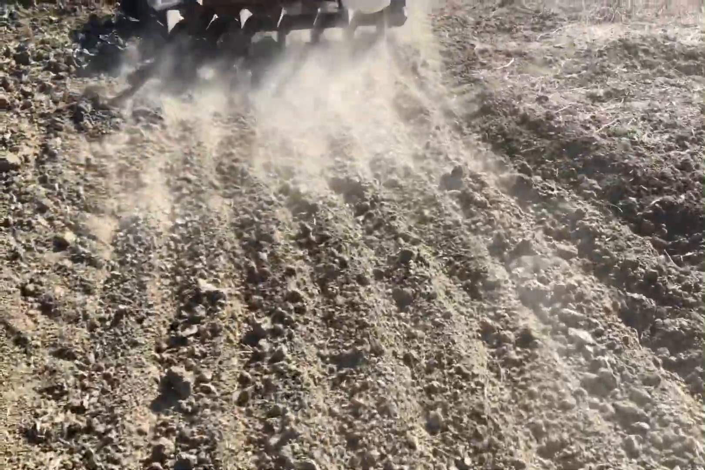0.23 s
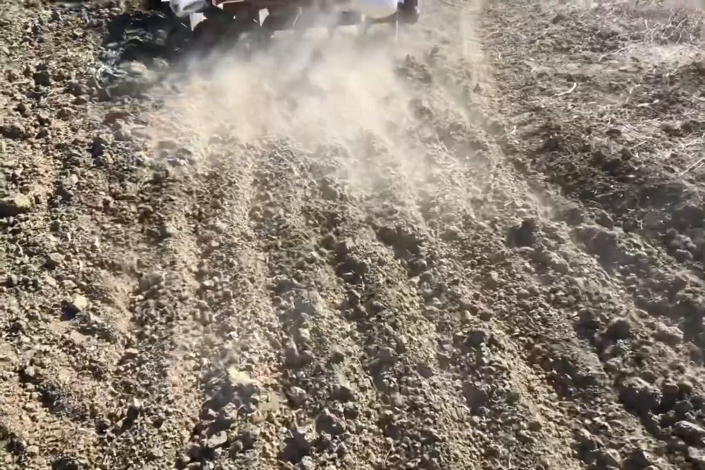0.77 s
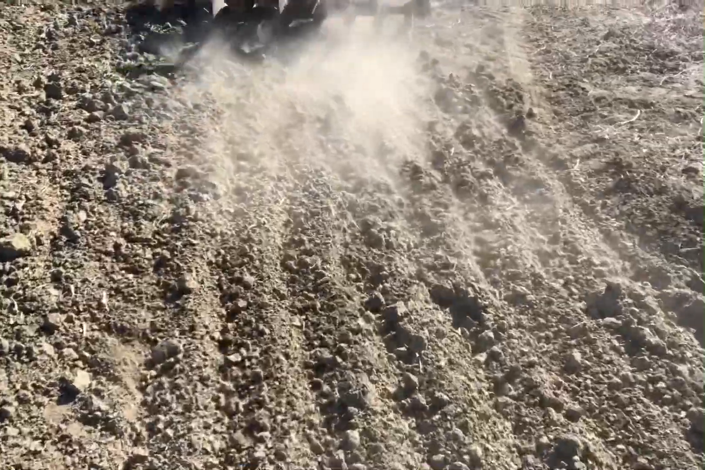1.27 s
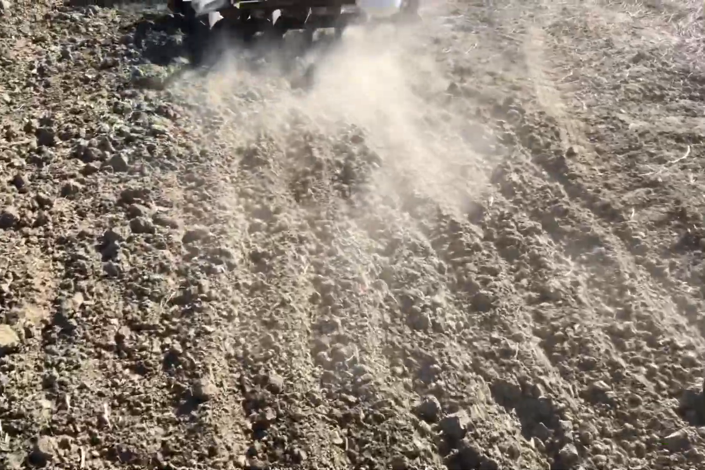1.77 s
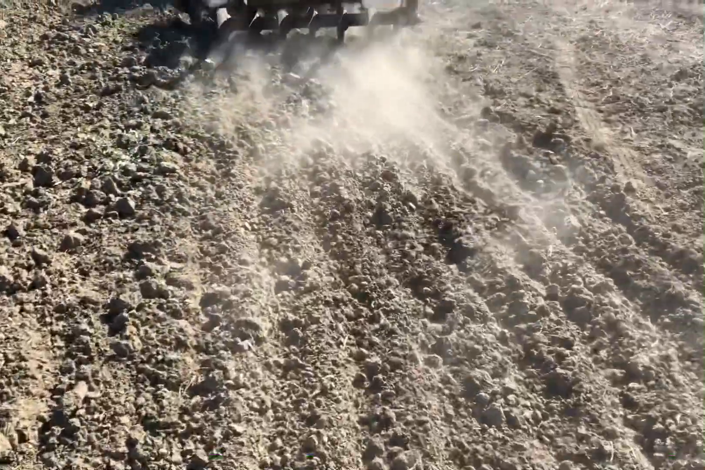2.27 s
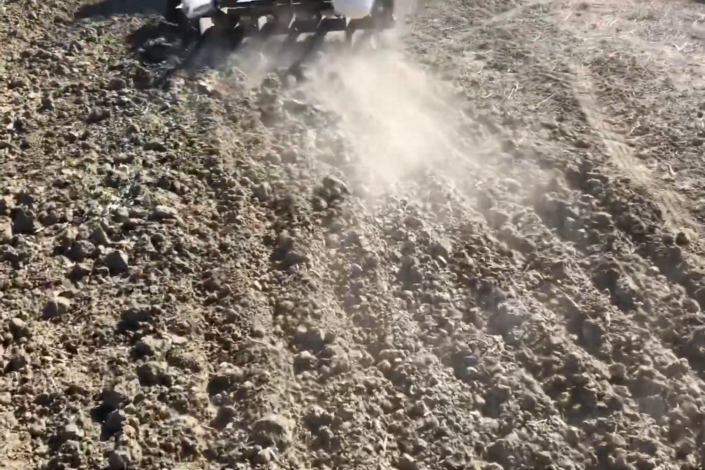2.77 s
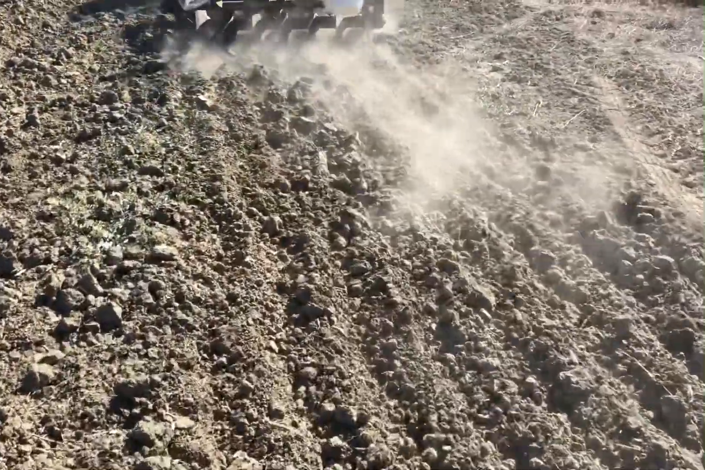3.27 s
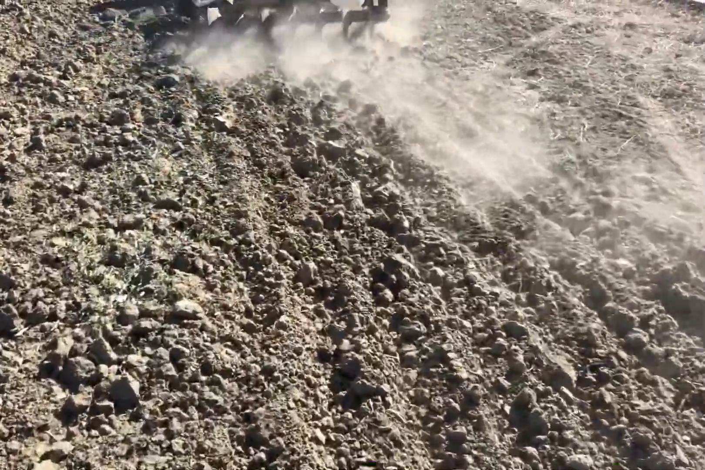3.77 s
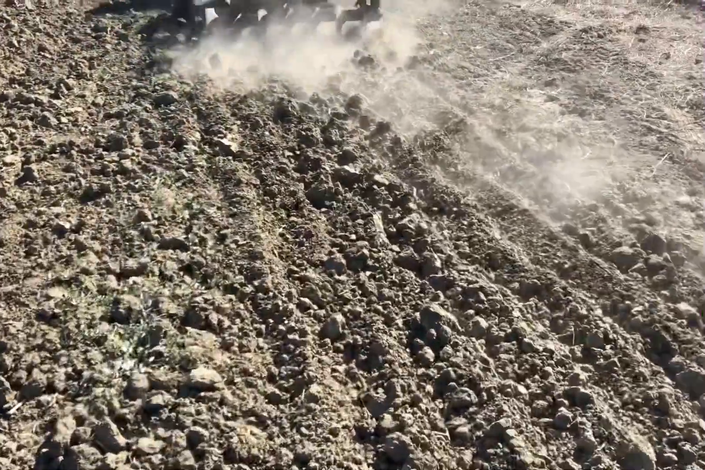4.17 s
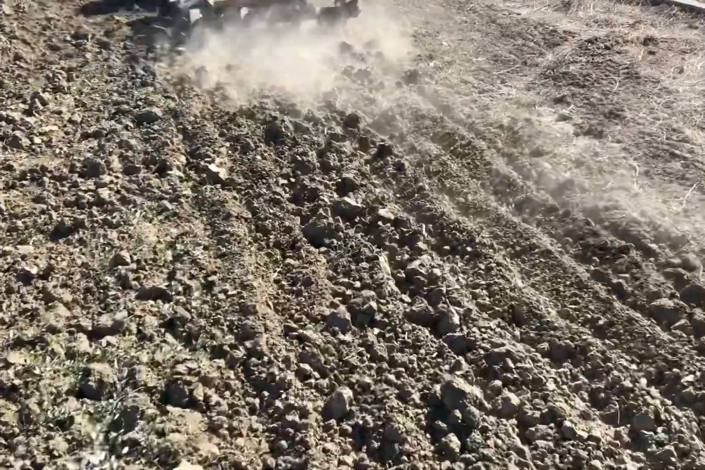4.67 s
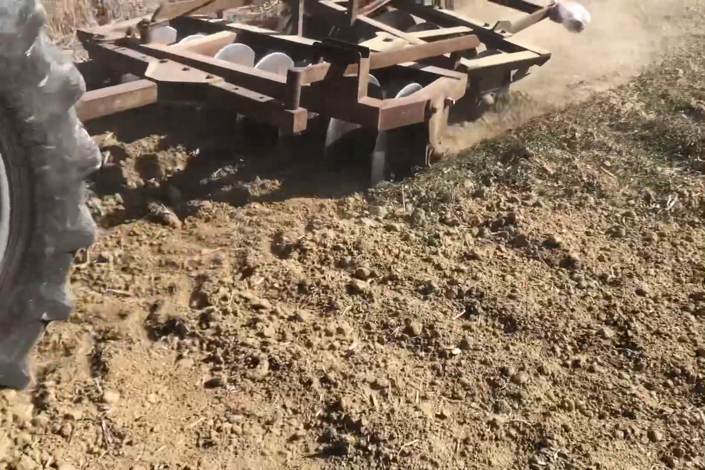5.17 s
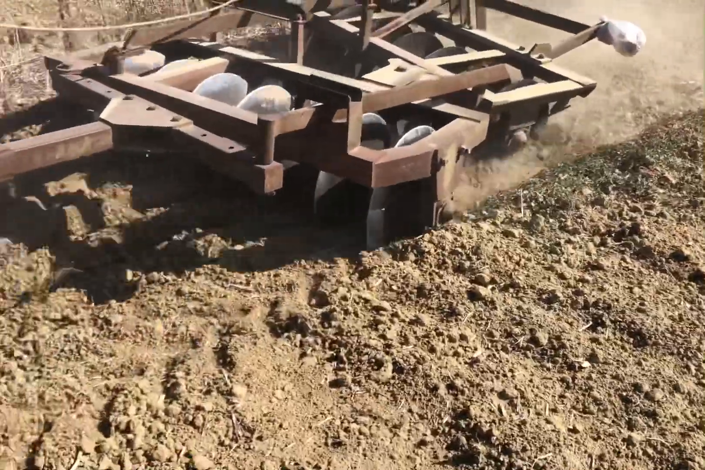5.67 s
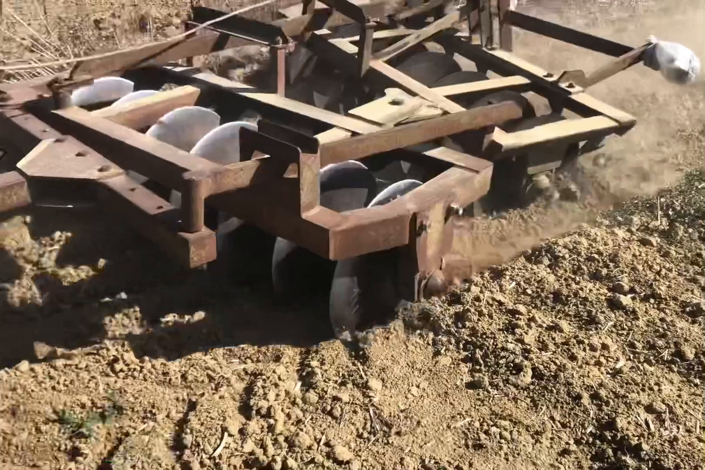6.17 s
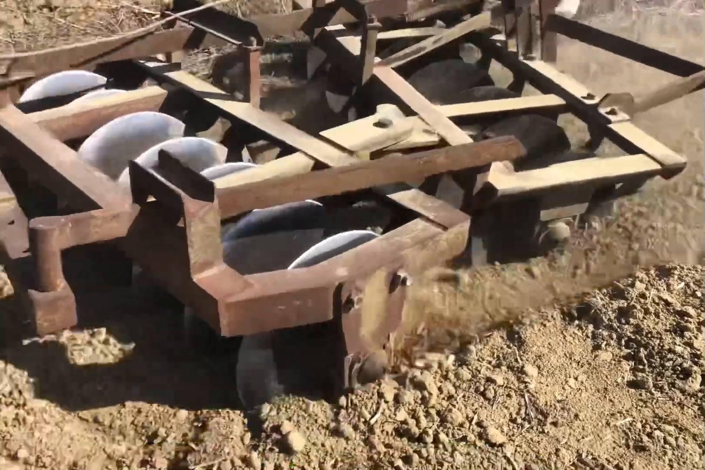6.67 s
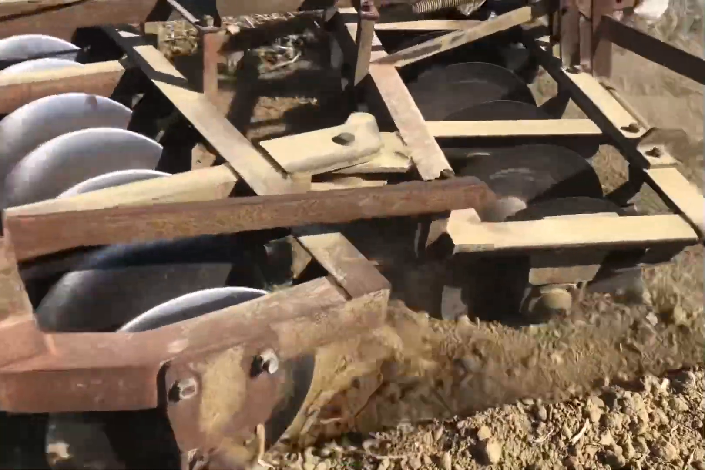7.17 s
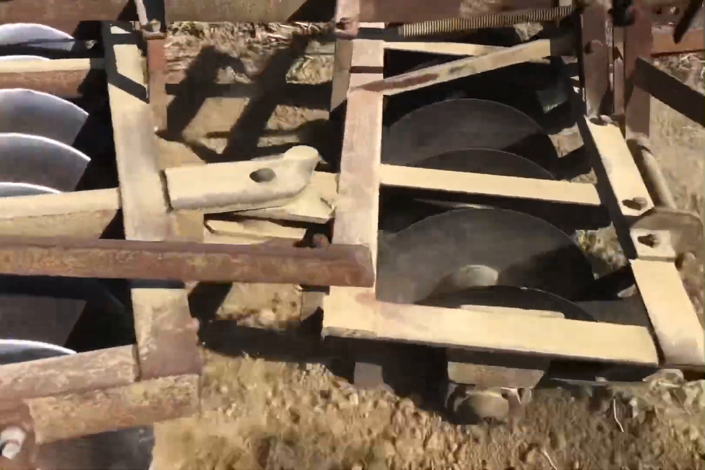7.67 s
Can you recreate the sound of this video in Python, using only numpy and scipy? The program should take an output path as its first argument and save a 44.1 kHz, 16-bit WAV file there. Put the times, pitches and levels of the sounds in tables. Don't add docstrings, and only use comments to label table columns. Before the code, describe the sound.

From 0 to about 4.8 s a tractor works at a distance in an open field: a low, almost constant diesel drone of rapid firings, mixed with dull, grainy soil and machine noise that slowly recedes. Light wind rumbles on the microphone; gusts duck the bass, notably in the first half second, near 1.3 s and around 3.5-4 s. Small stone clacks come irregularly, with very faint high squeaks. From 4 s the hiss brightens. At 4.8 s it cuts abruptly to a much louder close pass, slightly higher in pitch: engine clatter, whine and valve ticks, strongest near 5.1-5.5 s. A low air thud hits at 5.7 s; soil hiss swells at 5.9 s with a thin squeak at 6 s. The engine then fades, pins rattle, stones clank at 6.7 and 6.9 s, squeaks scatter around 7-7.4 s, and crunching soil and a loud burst of clanks finish at 7.7-7.9 s.

```python
import sys
import numpy as np
from scipy import signal
from scipy.io import wavfile

SR = 44100
rng = np.random.default_rng(int(sys.argv[2]) if len(sys.argv) > 2 else 0)


def unload_audio(sound):
    columns = np.transpose(np.atleast_2d(sound))
    steps = np.round(np.clip(columns, -1, 1) * 32767)
    wavfile.write(sys.argv[1], SR, steps.astype(np.int16))


def natural_amplitude(level_db):
    exponent = np.asarray(level_db, float) / 20
    return 10 ** exponent


N = 349272
CHANGE_S = 4.766


# t/s, firings per second
FIRING_RATE = [
    (0, 62.55),
    (2, 62.7),
    (3.4, 62.7),
    (4.0, 63.0),
    (4.76, 63.1),
    (4.77, 64.95),
    (6, 64.85),
    (7.92, 64.7),
]


def engine_cycle():
    return np.cumsum(2 * np.pi * curve(FIRING_RATE, np.arange(N) / SR) / 4 / SR)


def exhaust(cycle, order_db, unsteady_db):
    lag = rng.uniform(0, 2 * np.pi, len(order_db))
    out = 0
    for k, db in enumerate(order_db, 1):
        phase = k * cycle - np.pi / 10 + (k % 4 > 0) * lag[k - 1]
        level_db = db + (k > 4) * unsteady_db * drift(3.24, len(cycle))
        out = out + np.sqrt(2) * natural_amplitude(level_db) * np.cos(phase)
    return out


# multiple of the engine cycle, level/dB
FAR_ORDERS = [(1, -46), (2, -35), (3, -24), (4, 4), (5, -23.5), (6, -56), (7, -5.5), (8, 1), (9, -26),
              (10, -19), (11, -7.5), (12, -12.5), (13, -23.5), (14, -16), (15, -20), (16, -30), (17, -22),
              (18, -42), (19, -35.5), (20, -23.5), (21, -35), (22, -59)]
FAR_EXHAUST_DB = -33.5


def far_exhaust(cycle, t):
    order_db = np.array(FAR_ORDERS)[:, 1]
    return natural_amplitude(FAR_EXHAUST_DB + ducking_db(t)) * exhaust(cycle, order_db, unsteady_db=1.4)


# multiple of the engine cycle, level/dB
SIDE_ORDERS = [(1, -49), (2, -43), (3, -25), (4, 5.5), (5, -16), (6, -63), (7, -7), (8, -24.5), (9, -15),
               (10, -14), (11, -31.5), (12, -14.5), (13, -14), (14, -33), (15, -15), (16, -24), (17, -8.5),
               (18, -33), (19, -38), (20, -48), (21, -37.5), (22, -14)]
REAR_ORDERS = [(1, -46), (2, -39), (3, -23), (4, -0.5), (5, -18), (6, -23), (7, -10), (8, -0.5), (9, -24),
               (10, -22), (11, -5.5), (12, -18.5), (13, -14.5), (14, -20.5), (15, -53), (16, -16.5),
               (17, -22.5), (18, -17.5), (19, -19.5), (20, -27), (21, -65), (22, -28)]
NEAR_EXHAUST_DB, EXHAUST_FALL = -19, 0.7
STACK_ABEAM_S, STACK_CLOSEST_M = 5.45, 1.8
REAR_NOTE_CURVE = 1.4


def near_exhaust(cycle, t):
    along, distance = passing(t, STACK_ABEAM_S, STACK_CLOSEST_M)
    behind = (np.abs(along) / distance) ** REAR_NOTE_CURVE
    order_db = [side + behind * (rear - side) for (_, side), (_, rear) in zip(SIDE_ORDERS, REAR_ORDERS)]
    loss_db, _, _ = engine_view(t)
    return natural_amplitude(NEAR_EXHAUST_DB - EXHAUST_FALL * loss_db) * exhaust(cycle, order_db, unsteady_db=1.7)


# f/Hz, width/Hz, lift level/dB
CASING = [(630.4, 28.6, 10.5), (1254, 32, 6), (2760, 39, 5), (4040, 375, 11.5), (5250, 140, 4),
          (5200, 1170, 5), (6700, 130, 4), (10000, 1100, 0.5)]
# f/Hz, level per Hz/dB
CLATTER_COLOUR = [(130, -35), (220, 0), (278, -6), (326, 1.5), (547, 0), (609, 0), (755, -1), (1880, -1),
                  (2210, -6), (2780, -8.5), (3210, -23.5), (4590, -19.5), (5580, -18), (15700, -18)]
NEAR_CLATTER_DB, CLATTER_SHADOW_DB = -17, 7.5


def near_clatter(cycle, t):
    beat_db = knock(cycle, depth_db=1.5)
    clatter = grind(CLATTER_COLOUR, grains_per_s=1400, grain_db=-3.5, patchy_db=0.62, beat_db=beat_db)
    clatter += sum((natural_amplitude(db) - 1) * resonance(clatter, hz, width_hz) for hz, width_hz, db in CASING)
    whine = gear_whine(cycle)
    valve_gain = natural_amplitude(5.5 - 9.0 * (t - t[0]))
    ticks = valve_gain * valves(cycle)
    chassis = natural_amplitude(-10) * rumble(len(cycle), lumpy_db=-0.5)
    loss_db, end_on, gone_by = engine_view(t)
    level_db = NEAR_CLATTER_DB - loss_db - CLATTER_SHADOW_DB * end_on * gone_by
    return natural_amplitude(level_db) * (0.75 * clatter + whine + ticks + chassis)


def knock(cycle, depth_db):
    return depth_db * (np.cos(4 * cycle - 1.6) + 0.1 * np.cos(cycle - 2.4))


WHINE_ORDERS = [32, 44, 50, 56, 60, 64, 112, 168]
WHINE_DB = [-24, -20, -23, -18, -18, -18, -23, -29]


def gear_whine(cycle):
    out = 0
    for k, db in zip(WHINE_ORDERS, WHINE_DB):
        out = out + natural_amplitude(db + 2.5 * drift(5.0, len(cycle))) * np.sin(k * cycle)
    return out


# f/Hz, level/dB, t60/s
VALVE_MODES = [(2940, -19, .016), (3950, -22, .014), (5220, -17, .02), (5480, -15, .02), (5750, -17, .018),
               (6430, -17, .024), (7060, -21, .016)]


def valves(cycle):
    firing = np.floor(cycle * 2 / np.pi)
    at = np.flatnonzero(np.diff(firing))
    out = 0
    for hz, db, t60 in VALVE_MODES:
        tick_db = db + 4 * (firing[at] % 4 == 0) + rng.normal(0, 4, len(at))
        clicks = np.zeros(len(cycle))
        clicks[at] = natural_amplitude(tick_db) * either_sign(len(at))
        out = out + ring(clicks, hz, t60)
    return out


PUFF_DB, PUFF_RISE_DB_PER_S, PUFF_LOW_HZ = -49, 15.0, 7000


def puffs(cycle):
    firing = np.floor(cycle * 2 / np.pi).astype(int)
    strength_db = rng.normal(0, 3.5, firing[-1] + 1)[firing] + knock(cycle, depth_db=6.0)
    hiss = high_pass(rng.standard_normal(len(cycle)), PUFF_LOW_HZ)
    to_change = CHANGE_S - np.arange(len(cycle)) / SR
    level_db = PUFF_DB - PUFF_RISE_DB_PER_S * to_change
    return natural_amplitude(level_db) * rms_one(natural_amplitude(strength_db) * hiss) * (to_change > 0)


# f/Hz, level per Hz/dB
SOIL_COLOUR = [(130, -22), (220, -1), (314, -8), (404, -8), (450, 3.5), (703, -9), (919, 5.5), (1140, -10),
               (1270, -2.5), (2830, -13), (3210, -16), (10600, -21), (15700, -27)]
NEAR_SOIL_DB, SOIL_END_ON_DB = -32.5, 2.5
DISCS_ABEAM_S, DISCS_WIDTH_S, DISCS_LIFT_DB = 5.93, 0.29, 3
REAR_GANG_S, REAR_GANG_DB_PER_S = 7.5, 10.5


def near_soil(cycle, t):
    beat_db = knock(cycle, depth_db=0.1)
    soil = grind(SOIL_COLOUR, grains_per_s=1000, grain_db=-8.5, patchy_db=2.04, beat_db=beat_db)
    _, end_on, _ = engine_view(t)
    level_db = NEAR_SOIL_DB + SOIL_END_ON_DB * end_on
    level_db += DISCS_LIFT_DB * np.exp(-((t - DISCS_ABEAM_S) / DISCS_WIDTH_S) ** 2)
    level_db += REAR_GANG_DB_PER_S * np.maximum(t - REAR_GANG_S, 0)
    return natural_amplitude(level_db) * soil


# t/s, peak level/dB, centre f/Hz, rattle length/s, ring level/dB
STONES = [(0.312, -37, 1190, .01, -18), (.395, -36, 7000, .006, -28), (0.722, -26, 2200, 0.018, -34),
          (1.114, -26.5, 3800, .008, -32), (1.572, -27.5, 2030, 0.017, -27), (2.075, -25, 2410, .01, -29),
          (2.21, -25.5, 1560, 0.027, -34), (2.426, -24, 1900, .013, -31), (2.818, -22.5, 1520, 0.016, -32),
          (3.342, -25.5, 1190, 0.017, -30), (3.83, -35, 1500, 0.013, -22), (4.017, -27, 2860, 0.017, -34),
          (4.251, -24, 1900, 0.012, -33), (4.505, -27, 2580, 0.0099, -30), (6.693, -23, 5740, 0.0062, -26),
          (6.928, -21, 1270, 0.058, -26), (7.714, -14, 3900, 0.026, -33), (7.737, -13, 2940, 0.006, -26),
          (7.7416, -10, 4680, 0.014, -26), (7.763, -8, 397, .018, -25.5), (7.792, -10.5, 1410, 0.017, -40),
          (7.824, -22, 9000, 0.0079, -24), (7.852, -11, 2055, 0.014, -30), (7.86, -15, 400, 0.021, -27)]
# f/Hz, level/dB, t60/s
DISC_MODES = [(597, 1.5, 0.06), (1347, 4.5, 0.043), (1840, -12, 0.11), (1970, 2.5, 0.038), (3160, -6, 0.12),
              (4380, -4, 0.085), (6450, -11, 0.076), (6985, -8, 0.08)]
FAR_CRACK_TOP, NEAR_CRACK_TOP = 1.8, 3.4


def stones():
    size = 6000
    out = np.zeros(N + size)
    for s, db, hz, length, ring_db in STONES:
        fading = np.exp(-(np.arange(size) / (length * SR)) ** 2)
        uneven = rng.standard_normal(size) * natural_amplitude(2.75 * rng.standard_normal(size) - 8)
        clicks = natural_amplitude(db) * fading * uneven
        top_hz = hz * (FAR_CRACK_TOP if s < CHANGE_S else NEAR_CRACK_TOP)
        crack = band(clicks, hz / 5, min(top_hz, .45 * SR))
        hit = band(crack, hz / 8, min(1.4 * top_hz, .45 * SR))
        for spot_hz in np.clip(hz * 2 ** rng.uniform(-1.5, 1, 14), 300, 15000):
            hit += natural_amplitude(rng.normal(-35, 2.5)) * ring(clicks * either_sign(size), spot_hz, .022)
        in_tune = np.abs(clicks) * np.cos(3 * np.pi * hz * np.arange(size) / SR) / np.sqrt(length * SR)
        hit += natural_amplitude(ring_db + 4) * ring(in_tune, 1.5 * hz, .045)
        for mode_hz, mode_db, t60 in DISC_MODES:
            level_db = mode_db + ring_db + 0.5 - 2.8 * np.log2(mode_hz / hz) ** 2
            hit += natural_amplitude(level_db) * ring(clicks * either_sign(size), mode_hz, t60)
        start = int(s * SR)
        out[start:start + size] += hit
    return out[:N]


RATTLES_PER_S, RATTLE_T60_S, RATTLE_SPREAD_DB = 80, .07, 3.0
FAR_RATTLE_DB, NEAR_RATTLE_DB, RATTLE_FADE_DB_PER_S = -52, -26.5, 5


def rattles():
    t = np.arange(N) / SR
    sizes = natural_amplitude(RATTLE_SPREAD_DB * np.minimum(rng.exponential(1, N), 4))
    knocks = sizes * (rng.random(N) < RATTLES_PER_S / SR)
    pitches = 500 * 2 ** rng.uniform(0, 2.4, 24)
    part = rng.integers(0, 24, N)
    out = 0
    for k, hz in enumerate(pitches):
        out = out + natural_amplitude(-4.0 * np.log2(hz / 500)) * ring(knocks * (part == k), hz, RATTLE_T60_S)
    near_db = NEAR_RATTLE_DB - RATTLE_FADE_DB_PER_S * (t - CHANGE_S)
    return natural_amplitude(np.where(t < CHANGE_S, FAR_RATTLE_DB, near_db)) * rms_one(out)


# t/s, length/s, level/dB
SQUEAKS = [(0.838, .03, -55), (1.24, .05, -58), (2.22, .04, -59), (2.39, .02, -58), (2.48, .05, -59),
           (2.72, .08, -60), (2.785, 0.051, -50), (5.97, .05, -41), (6.008, .045, -35), (6.914, .065, -45),
           (7.038, .07, -48), (7.148, .04, -51), (7.21, .03, -43), (7.34, .03, -45), (7.43, .03, -47),
           (7.802, 0.092, -45)]
SQUEAK_HZ = 10345


def squeaks():
    loudness = np.sqrt(2) * natural_amplitude(3.0 * drift(40, N))
    hz = SQUEAK_HZ + 25 * drift(31, N)
    note = loudness * np.sin(np.cumsum(2 * np.pi * hz / SR))
    out = np.zeros(N)
    for s, length, db in SQUEAKS:
        span, swell = bump(s, length)
        out[span] += natural_amplitude(db + 1.0) * np.sqrt(swell) * note[span]
    return out


# f/Hz, level per Hz/dB
FAR_COLOUR = [(150, -7), (260, -9.5), (336, -23.5), (413, -2), (458, -3), (603, -3.5), (668, -3),
              (1200, -3), (1400, -3.5), (3720, -18), (5920, -26), (8780, -25), (15700, -33)]
FAR_NOISE_DB, FAR_TREBLE_DB, RECEDE_DB_PER_S = -36, -32.5, 0.33
SWELL_S, SWELL_TREBLE_DB, SWELL_CURVE = 3.93, 8, 1.9


def far_machine(cycle, t):
    beat_db = knock(cycle, depth_db=1.35)
    noise = grind(FAR_COLOUR, grains_per_s=830, grain_db=-24, patchy_db=0.94, beat_db=beat_db)
    noise = noise + resonance(noise, 603, 45) + natural_amplitude(-6) * resonance(noise, 870, 32)
    bright = high_pass(noise, 2400)
    away_db = -RECEDE_DB_PER_S * t
    swelled = np.maximum(t - SWELL_S, 0) / (CHANGE_S - SWELL_S)
    treble_db = FAR_TREBLE_DB + away_db + SWELL_TREBLE_DB * swelled ** SWELL_CURVE
    return natural_amplitude(FAR_NOISE_DB + away_db) * (noise - bright) + natural_amplitude(treble_db) * bright


# t/s, level/dB
WIND = [
    (0, -36.5),
    (.6, -37.5),
    (1.1, -38),
    (1.7, -37),
    (2.3, -38),
    (3.3, -45.5),
    (3.65, -34),
    (4.1, -45),
    (4.76, -33.5),
]
WIND_DUCK_SHARE = 0.68


def wind(t):
    level_db = curve(WIND, t) + WIND_DUCK_SHARE * ducking_db(t)
    return natural_amplitude(level_db) * rumble(len(t), lumpy_db=1.5)


# deepest t/s, depth level/dB, fall/s, recovery/s
DUCKS = [
    (0.0, 8, .03, 0.064),
    (.22, 7, 0.065, .035),
    (.55, 6, 0.055, 0.1),
    (1.34, 5, 0.029, 0.07),
    (3.53, 3.5, 0.037, 0.035),
    (3.76, 3.5, 0.09, 0.082),
    (3.9, 6, 0.088, 0.076),
    (4.44, 1.5, 0.15, .1),
]


def ducking_db(t):
    return -sum(db * np.exp(-((t - s) / np.where(t < s, fall, recovery)) ** 2) for s, db, fall, recovery in DUCKS)


# t/s, length/s, level/dB, f/Hz
BUFFETS = [
    (5.714, .046, -11, 155),
    (5.772, .03, -20, 130),
]


def buffets():
    out = np.zeros(N)
    for s, length, db, hz in BUFFETS:
        span, swell = bump(s, length)
        push = np.sin(2 * np.pi * hz * np.arange(len(span)) / SR)
        flutter = band(rng.standard_normal(8000), 1.3 * hz, 2.8 * hz)[-len(span):]
        out[span] += natural_amplitude(db) * swell * (push + .65 * rms_one(flutter))
    return out


def rumble(size, lumpy_db):
    return natural_amplitude(lumpy_db * drift(9.8, size)) * rms_one(band(rng.standard_normal(size), 63, 199))


PORT_STEP_HZ, PORT_STEP_DB = 11776, -4.0


def grind(colour, grains_per_s, grain_db, patchy_db, beat_db):
    size = len(beat_db)
    sizes = natural_amplitude(5.9 * np.minimum(rng.exponential(1, size), 5))
    grains = sizes * either_sign(size) * (rng.random(size) < grains_per_s / SR)
    source = rng.standard_normal((2, size)) + natural_amplitude(grain_db) * rms_one(grains)
    together = drift(12.0, size)
    edges = PORT_STEP_HZ * 2 ** (np.arange(-18, 3) / 3)
    hz_points, db_points = np.transpose(colour)
    out = 0
    for k, (low, high) in enumerate(zip(edges, edges[1:])):
        hz = np.sqrt(low * high)
        treble = np.clip(np.log2(hz / 200) / 6, 0, 1)
        level_db = np.interp(np.log(hz), np.log(hz_points), db_points) + PORT_STEP_DB * (hz > PORT_STEP_HZ)
        patches = treble * together + 0.45 * drift(5.6, size)
        out = out + natural_amplitude(level_db + patchy_db * patches + treble * beat_db) * band(source[k % 2], low, high)
    return rms_one(out)


SPEED_M_PER_S = 3.04


def passing(t, abeam_s, closest_m):
    along = SPEED_M_PER_S * (t - abeam_s)
    return along, np.hypot(along, closest_m)


ABEAM_S, CLOSEST_M = 5.126, 3.7


def engine_view(t):
    along, distance = passing(t, ABEAM_S, CLOSEST_M)
    return 20 * np.log10(distance / CLOSEST_M), np.abs(along) / distance, along > 0


def ring(clicks, hz, t60):
    r, w = natural_amplitude(-60 / (t60 * SR)), 2 * np.pi * hz / SR
    return signal.lfilter([0, np.sin(w)], [1, -2 * r * np.cos(w), r * r], clicks + 1e-18)


def resonance(x, hz, width_hz):
    r = np.exp(-np.pi * width_hz / SR)
    poles = [1, -2 * r * np.cos(2 * np.pi * hz / SR), r * r]
    return signal.lfilter(np.array([1, 0, -1]) * (1 - r * r) / 2, poles, x)


def band(x, low_hz, high_hz):
    return signal.sosfilt(signal.butter(2, [low_hz, high_hz], "band", fs=SR, output="sos"), x)


def high_pass(x, hz):
    return signal.sosfilt(signal.butter(2, hz, "high", fs=SR, output="sos"), x)


def drift(rate, size):
    r = np.exp(-80 * np.pi * rate / SR)
    slow = signal.lfilter([1], [1, -2 * r, r * r], rng.standard_normal(size // 40 + 2002))[2000:]
    return np.interp(np.arange(size) / 40, np.arange(len(slow)), rms_one(slow - slow.mean()))


def bump(s, length):
    size = max(int(length * SR), 8)
    span = np.arange(int(s * SR), min(int(s * SR) + size, N))
    return span, np.hanning(size)[:len(span)]


def either_sign(size):
    return rng.choice([-1, 1], size)


def rms_one(x):
    return x / np.sqrt(np.mean(x ** 2) + 1e-20)


def curve(rows, t):
    s, values = np.transpose(rows)
    return np.interp(t, s, values)


def far_view(cycle, t):
    return far_exhaust(cycle, t) + far_machine(cycle, t) + wind(t)


FADE_IN_S = .026


def near_view(cycle, t):
    fade_in = np.clip((t - t[0]) / FADE_IN_S, .36, 1) ** 1.7
    return fade_in * (near_exhaust(cycle, t) + near_clatter(cycle, t) + near_soil(cycle, t))


def scene():
    cycle, t = engine_cycle(), np.arange(N) / SR
    change = int(CHANGE_S * SR)
    far = far_view(cycle[:change], t[:change])
    near = near_view(cycle[change:], t[change:])
    tractor = np.concatenate([far, near])
    return (tractor + puffs(cycle) + stones() + rattles() + squeaks() + buffets())[None]


def low_pass(x):
    return signal.sosfilt(signal.butter(12, 15890, fs=SR, output="sos"), x)


def record(dry):
    heard = high_pass(dry, 35)
    heard = 1.3 * np.tanh(heard / 1.3)
    heard = heard - .25 * resonance(heard, 13000, 2000)
    heard = signal.sosfilt(signal.ellip(12, .5, 70, 15715, fs=SR, output="sos"), heard)
    return low_pass(heard)


dry = scene()
out = record(dry)
unload_audio(out)
```